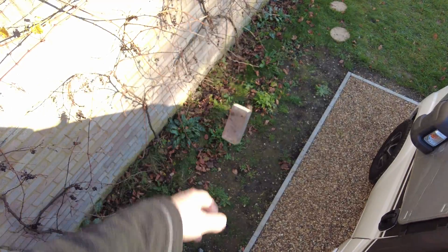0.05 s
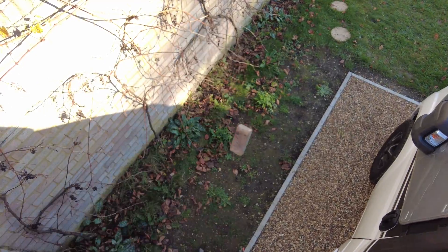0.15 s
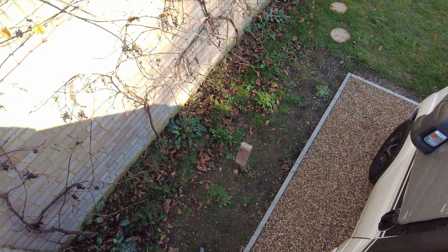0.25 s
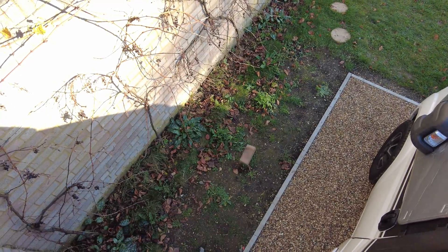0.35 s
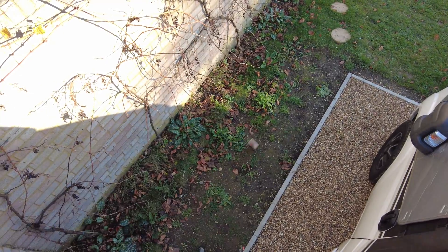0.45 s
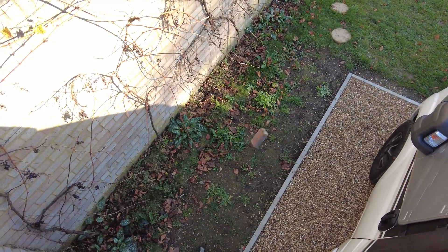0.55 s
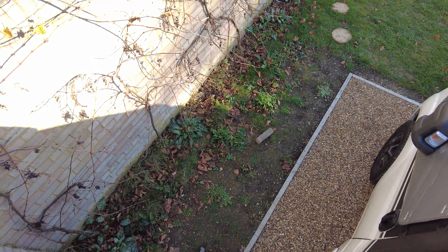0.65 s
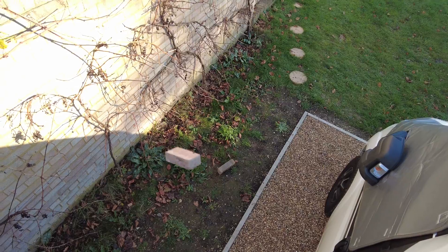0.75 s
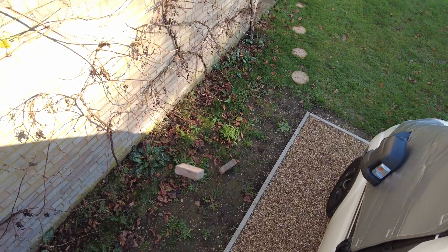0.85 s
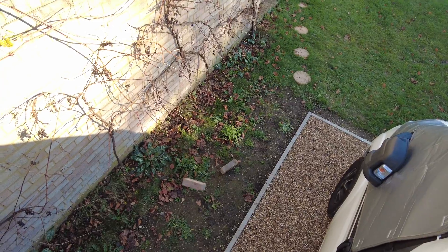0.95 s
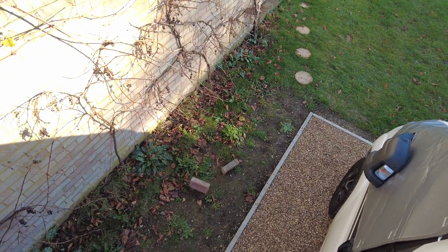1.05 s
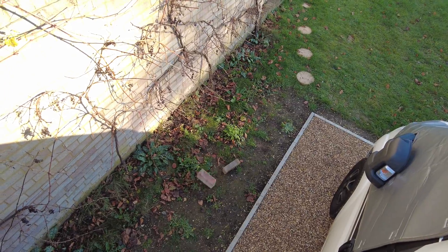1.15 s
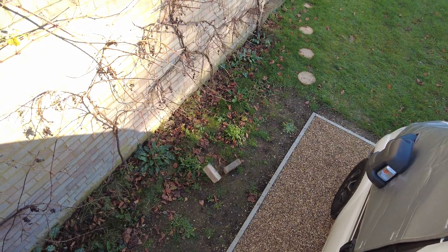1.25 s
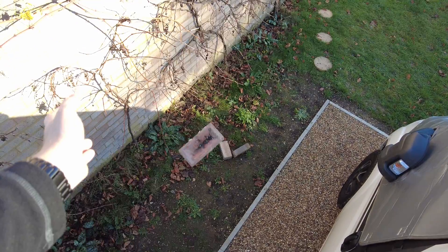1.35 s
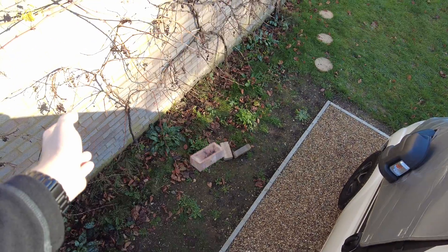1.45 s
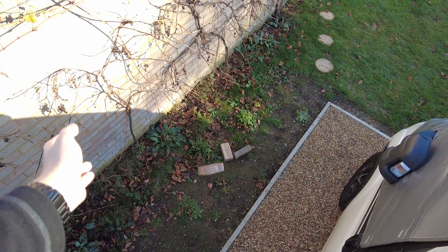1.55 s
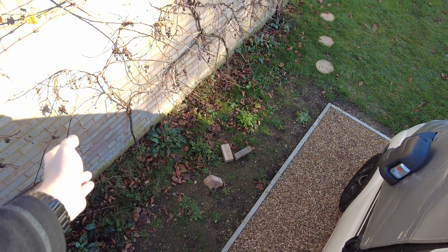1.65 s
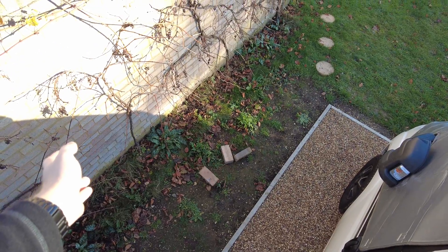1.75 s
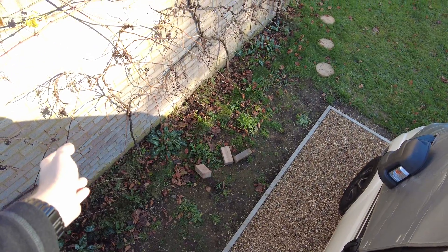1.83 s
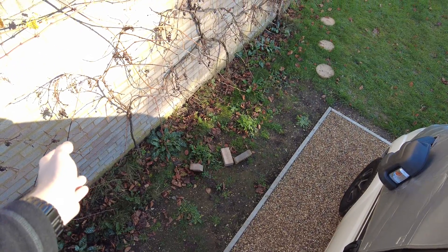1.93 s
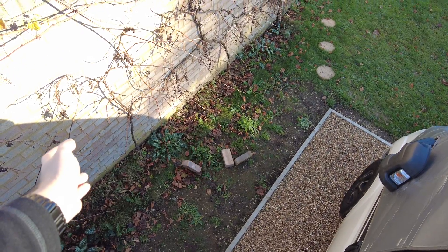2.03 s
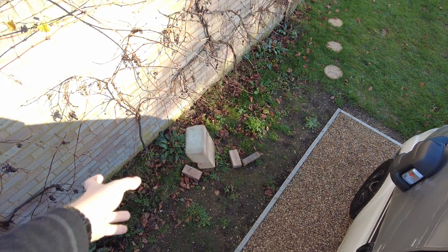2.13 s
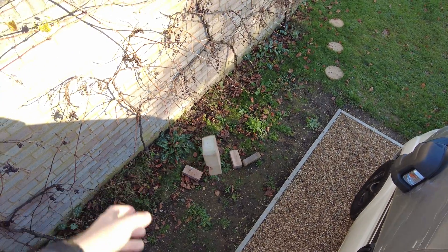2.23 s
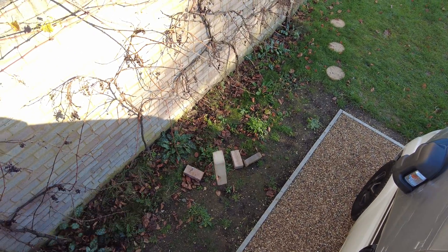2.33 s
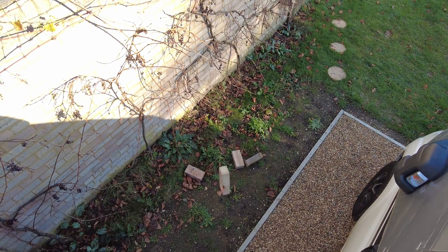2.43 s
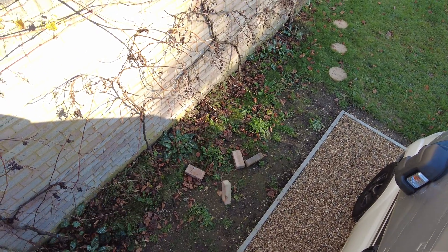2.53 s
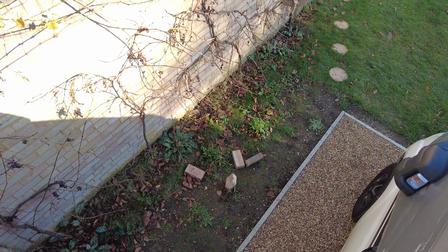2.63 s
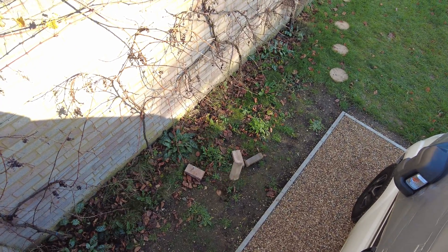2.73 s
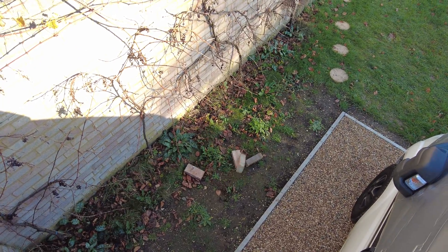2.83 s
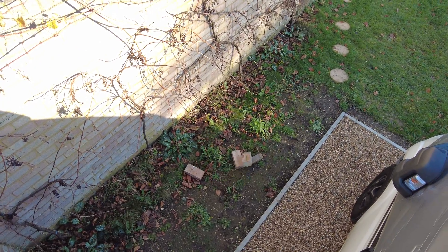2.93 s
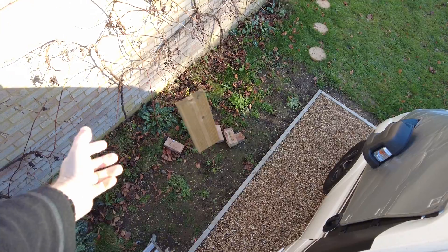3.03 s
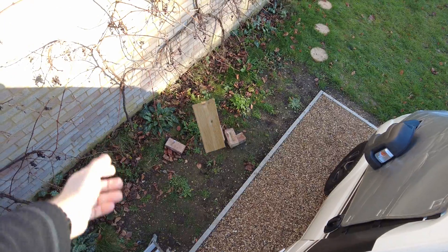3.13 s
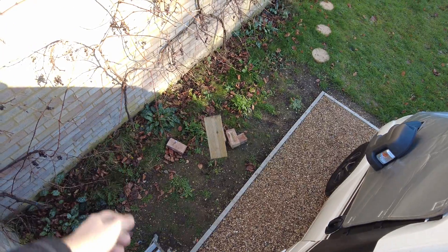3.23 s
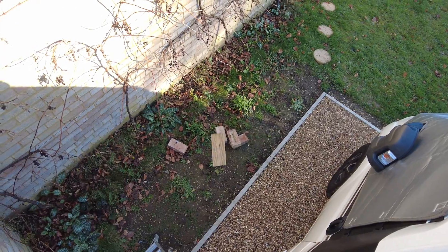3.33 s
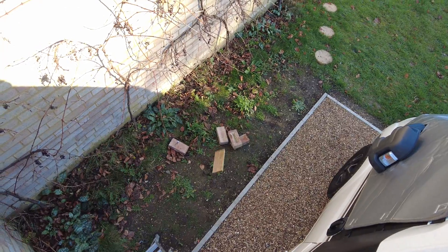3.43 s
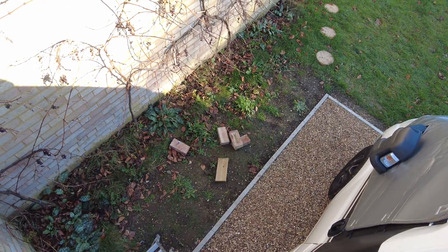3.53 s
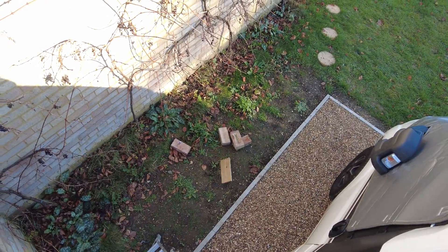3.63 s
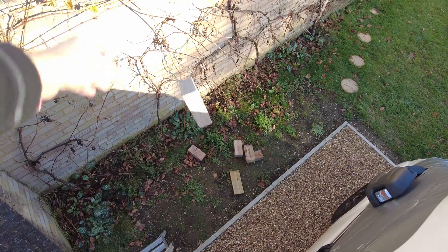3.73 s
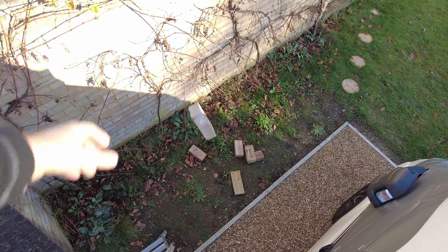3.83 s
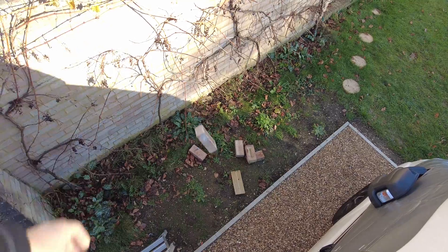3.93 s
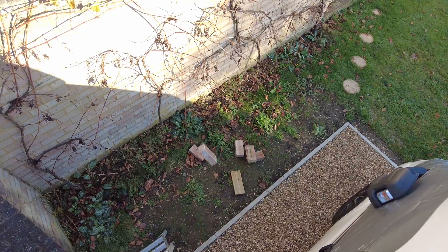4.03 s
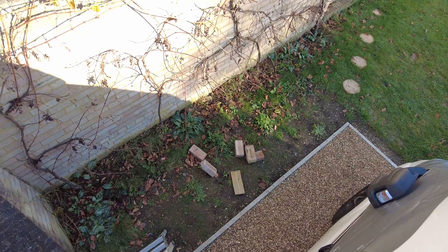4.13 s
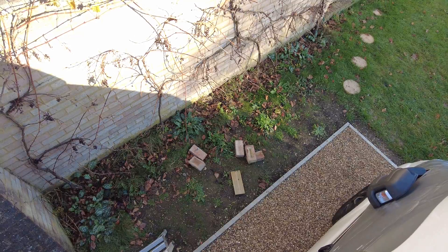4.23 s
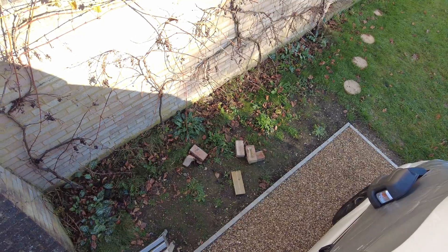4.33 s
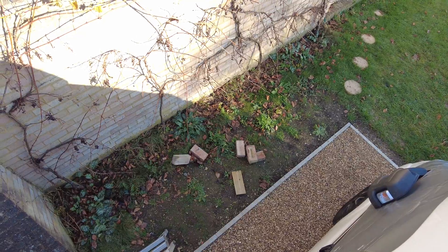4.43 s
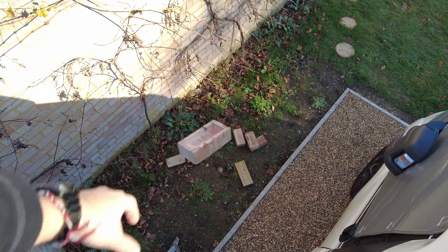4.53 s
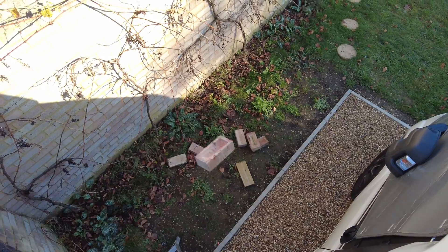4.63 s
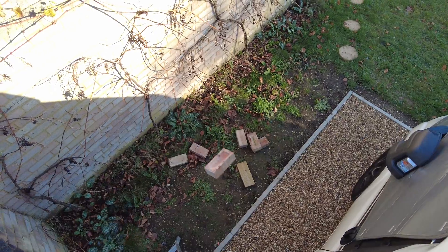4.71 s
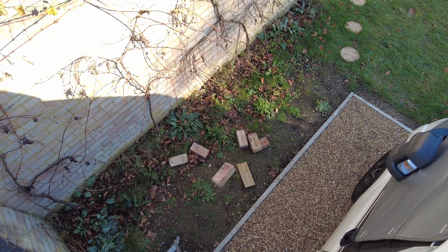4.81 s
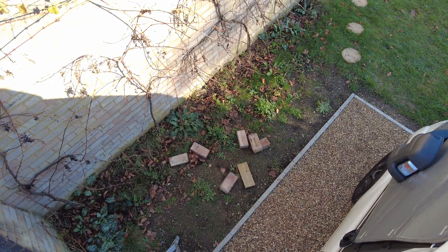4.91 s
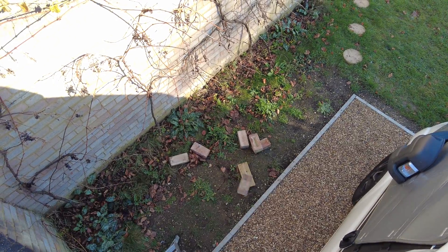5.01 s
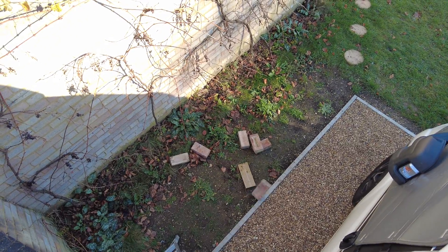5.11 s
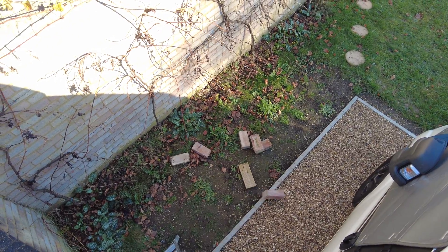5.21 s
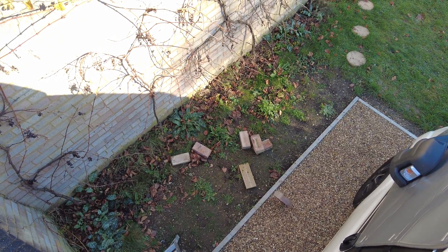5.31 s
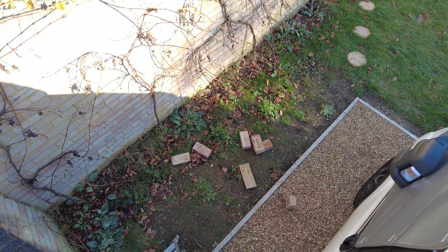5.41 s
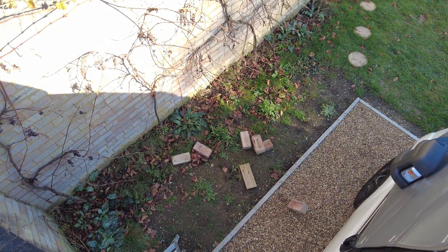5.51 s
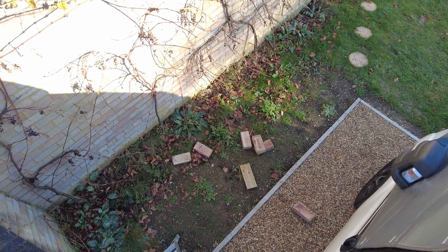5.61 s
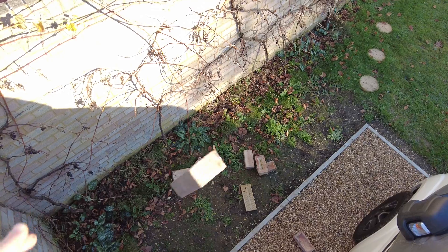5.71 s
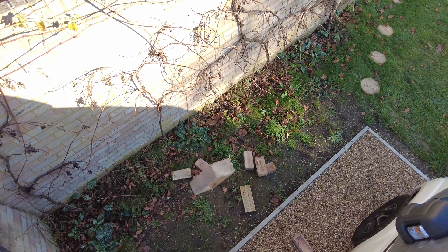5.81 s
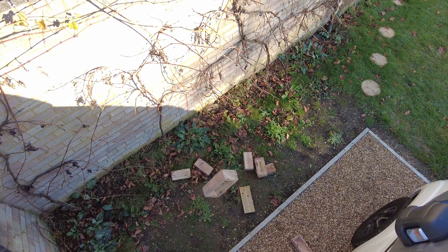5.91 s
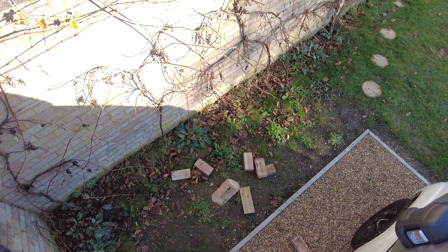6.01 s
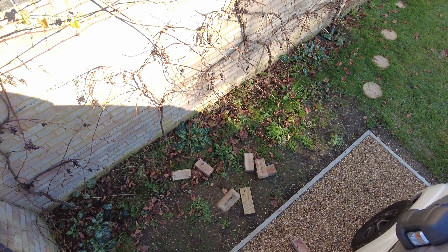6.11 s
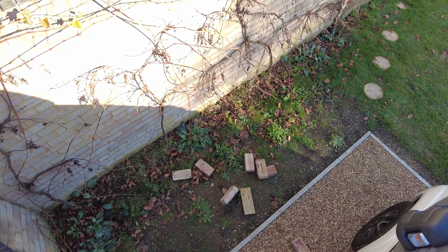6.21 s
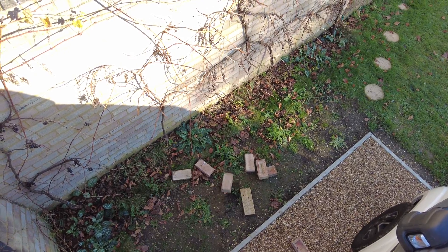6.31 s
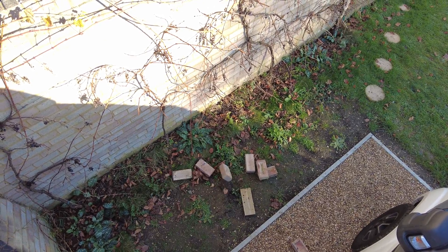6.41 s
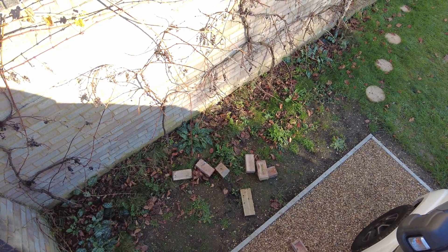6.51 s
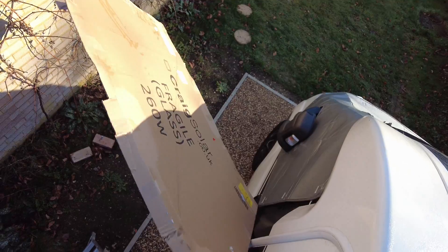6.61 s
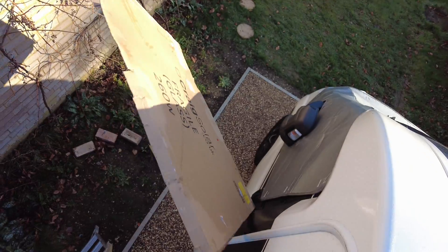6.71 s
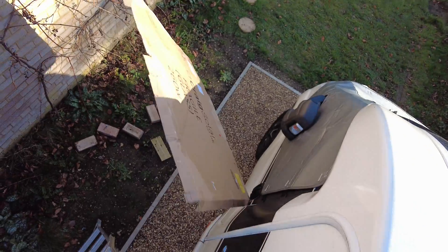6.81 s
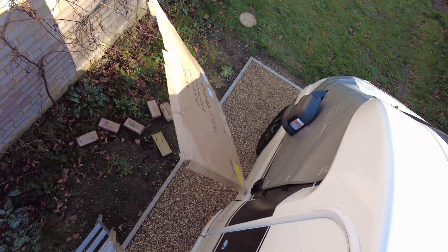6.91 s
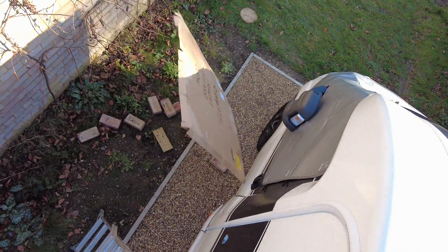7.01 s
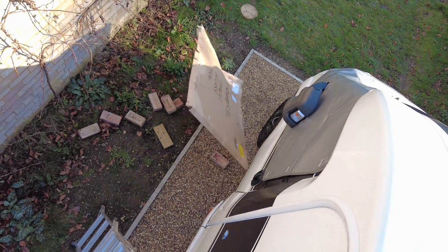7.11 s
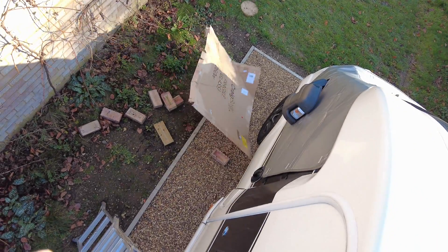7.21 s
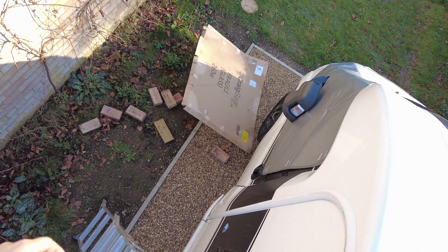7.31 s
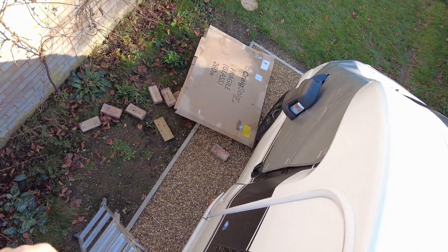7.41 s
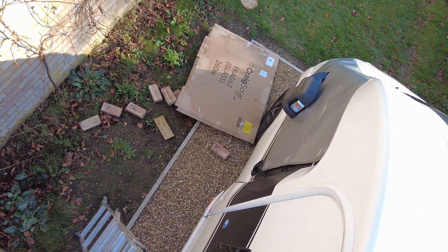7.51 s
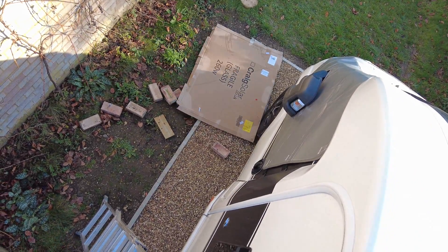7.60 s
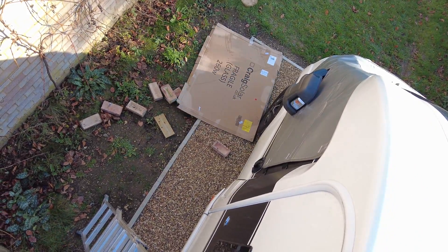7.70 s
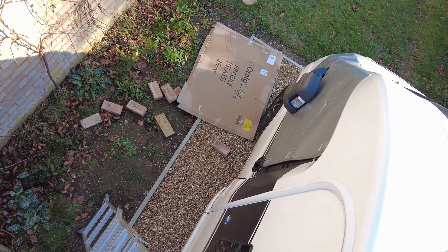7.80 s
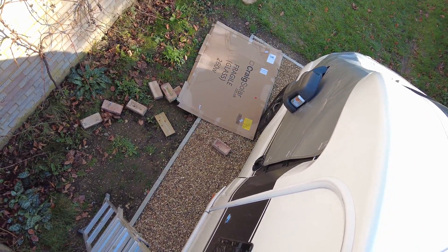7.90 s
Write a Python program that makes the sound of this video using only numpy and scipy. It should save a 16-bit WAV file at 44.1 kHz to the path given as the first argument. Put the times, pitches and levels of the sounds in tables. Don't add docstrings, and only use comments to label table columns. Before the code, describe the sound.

Bricks and a plank are thrown onto garden soil with dull thuds, knocks and ringing clinks amid buffeting wind, then a cardboard sheet slaps down.

```python
import sys
import numpy as np
from scipy import signal
from scipy.fft import rfft, irfft, next_fast_len
from scipy.io import wavfile
from scipy.ndimage import uniform_filter1d, minimum_filter1d

SR = 44100
rng = np.random.default_rng(int(sys.argv[2]) if len(sys.argv) > 2 else 0)


def convert_level_to_amplitude(level_db):
    exponent = np.asarray(level_db, float) / 20
    return 10 ** exponent


def store_wav(level_fs):
    pcm = np.round(np.clip(np.atleast_2d(level_fs), -1, 1) * 32767)
    wavfile.write(sys.argv[1], SR, pcm.T.astype(np.int16))


N = 350771
T = np.arange(N) / SR

# start_s, traffic_db, breeze_lull_db, cut_step (-1..1)
TAKES = [
    (0, -36.5, -47.5, 0),
    (0.701, -39.5, -38, -0.28),
    (1.3175, -43.5, -40, -0.49),
    (2.1194, -43.5, -34.5, -0.011),
    (3.0336, -44.5, -39.5, 0.05),
    (3.42, -43, -38.5, 0),
    (3.7344, -41, -37.5, -0.12),
    (4.568, -40.5, -43.5, -0.03),
    (5.681, -39.5, -27.5, -0.0021),
    (6.634, -33.5, -30, 0.092),
]
CUTS = np.array([row[0] for row in TAKES[1:] if row[0] != TAKES[5][0]] + [N / SR])


def per_take(table):
    return np.array(table)[np.searchsorted(np.array(TAKES)[:, 0], T, "right") - 1].T


def take_end(start_s):
    return min([row[0] for row in TAKES if row[0] > start_s] + [N / SR])


def after(s):
    end_s = min(CUTS[CUTS > s][0], s + 0.6)
    span = slice(int(s * SR), int(end_s * SR))
    return span, T[span] - T[span.start]


def swells(rows):
    piece = np.searchsorted(CUTS, T, "right")
    tents = []
    for s, top_db, rise_db_s, fall_db_s, *_ in rows:
        tent_db = top_db - np.maximum(rise_db_s * (s - T), fall_db_s * (T - s))
        tents.append(np.where(piece == np.searchsorted(CUTS, s, "right"), tent_db, -90))
    db = np.array(tents)
    return np.maximum(db.max(axis=0), -90), db.argmax(axis=0)


def unit(x):
    return x / np.sqrt(np.mean(x ** 2))


def colour(x, spectrum):
    hz, db = np.transpose(spectrum)
    f = np.maximum(np.fft.rfftfreq(N, 1 / SR), 1)
    gain = convert_level_to_amplitude(np.interp(np.log(f), np.log(hz), db, left=-90, right=-90))
    return unit(irfft(rfft(x) * gain, N))


def walk(rate_hz):
    k = int(SR / rate_hz)
    held = np.repeat(rng.standard_normal(N // k + 1), k)
    return unit(uniform_filter1d(uniform_filter1d(held, k), k)[:N])


def grains(rate_hz, spread_db, bed):
    hits = rng.random(N) < rate_hz / SR
    clicks = hits * convert_level_to_amplitude(spread_db * rng.exponential(size=N)) * rng.standard_normal(N)
    return unit(clicks) + bed * rng.standard_normal(N)


def band(x, hz, width_hz):
    return signal.lfilter(*signal.iirpeak(hz, hz / width_hz, SR), x)


def lowpass(x, order, hz):
    return signal.sosfiltfilt(signal.butter(order, hz, fs=SR, output="sos"), x)


def highpass(x, order, hz):
    return signal.sosfiltfilt(signal.butter(order, hz, "high", fs=SR, output="sos"), x)


def patchy(x, patch_db, rate_hz):
    centres_hz = 700 * 2 ** np.arange(0, 4.6, 0.5)
    return unit(sum(band(x, hz, hz * 0.4) * convert_level_to_amplitude(patch_db * walk(rate_hz)) for hz in centres_hz))


def brighten(x, db):
    low = lowpass(x, 2, 7440)
    return low + convert_level_to_amplitude(db) * (x - low)


def fade(t, t60_s):
    return np.exp(-np.log(1000) * t / t60_s)


def ring(t, modes):
    return sum(convert_level_to_amplitude(db) * fade(t, t60_s) * np.sin(2 * np.pi * hz * t) for hz, db, t60_s in modes)


# hz, level_db
WIND = [(18, -5.5), (45, -4.5), (90, -2.5), (150, -6.5), (230, -14), (400, -34)]
FLUTTER = [(120, -29.5), (220, 3), (400, 0), (800, -20), (1400, -35), (2500, -64)]
BREEZE_COLOUR = [(18, -2.5), (35, -4), (65, -9), (110, -11), (200, -27), (400, -52.5)]
# peak_s, level_db, rise_db_s, fall_db_s, flutter_rel_db
GUSTS = [(0.026, -17, 300, 58, -26), (0.101, -12.5, 110, 116, -8.5), (.226, -12.5, 126.5, 43, 1),
         (0.401, -8, 36, 20, -7.5), (.635, -5.5, 128.5, 30, -15.5), (.69, -6, 60, 3, -2.5),
         (1.11, -7.5, 900, 109, -12), (1.185, -8, 398.5, -1, -16.5), (3.4, -19.5, 499, 200.5, -27),
         (3.504, -5, 421, 374, -21.5), (3.62, -18.5, 695, 57, -19), (4.585, -10.5, 1500.5, 598, -12.5)]
# peak_s, level_db
PUFFS = [(1.51, -43.5), (1.768, -12), (2.19, -20), (2.31, -22), (2.499, -29), (2.682, -10), (2.79, -29),
         (3.139, -23.5), (4.1, -31), (4.24, -15.5), (4.41, -26), (4.71, -28.5), (5.0, -30), (5.29, -45.5),
         (5.724, -20), (6.37, -20.5), (6.46, -27), (7.01, -36), (7.39, -25)]
# start_s, peak_db, swing_hz
POPS = [(0.022, -8.5, 60), (0.064, -7.5, 62), (0.137, -9, 75), (0.31, -0.5, 84), (0.556, -7, 95),
        (0.601, -9, 110), (0.105, -6, 141), (0.173, -4.5, 118), (0.214, 3.5, 195), (0.24, -3, 140),
        (0.261, -6.5, 120.5), (0.336, -3.5, 194), (0.363, -14, 118), (0.376, 7.5, 199.3), (0.393, 8, 130),
        (0.427, 7.5, 139), (0.455, -1.5, 130), (0.53, -17, 131), (0.624, -1, 129), (0.676, 6.5, 193),
        (0.688, 7.5, 127), (1.181, -1.5, 140.3), (1.2509, -1.5, 320), (1.284, -10, 202), (3.492, -4.5, 95),
        (3.685, -19.5, 204), (3.705, -18.5, 150)]


def wind():
    puff_rise_db_s, puff_fall_db_s = 450, 199.5
    flutter_per_db = 2
    puffs = walk(28)
    buffet = unit(colour(rng.standard_normal(N), WIND) * convert_level_to_amplitude(3.16 * puffs))
    flutter = unit(colour(rng.standard_normal(N), FLUTTER) * convert_level_to_amplitude(2.4 * puffs + 5.4 * walk(70)))
    gust_db, leader = swells(GUSTS)
    _, top_db, _, _, flutter_db = np.array(GUSTS)[leader].T
    out = convert_level_to_amplitude(gust_db) * (buffet + convert_level_to_amplitude(flutter_db + flutter_per_db * (gust_db - top_db)) * flutter)

    puff_db = swells([(s, db, puff_rise_db_s, puff_fall_db_s) for s, db in PUFFS])[0]
    breeze = unit(colour(rng.standard_normal(N), BREEZE_COLOUR) * convert_level_to_amplitude(1.6 * walk(13)))
    out += (convert_level_to_amplitude(per_take(TAKES)[2]) + convert_level_to_amplitude(puff_db)) * breeze

    pops = np.zeros(N)
    for s, db, swing_hz in POPS:
        span, t = after(s)
        swing = fade(t, 6 / swing_hz) * np.cos(2 * np.pi * swing_hz * t)
        pops[span] -= convert_level_to_amplitude(db + 1.5) * swing * (1 - np.exp(-t * swing_hz / 0.055)) ** 3
    return out + lowpass(pops, 2, 1300)


# hz, level_db
TRAFFIC = [(71, -36), (120, -10.5), (210, -4.5), (355, -11), (520, -20.5), (1250, -29.5), (12000, -54),
           (13300, -73)]
# start_s, start_hz, end_hz, width_hz, level_db
DRONES = [
    (0.706, 367, 250, 70, -51),
    (1.3176, 198, 165.6, 60, -32.5),
    (3.041, 197.8, 190, 60, -43.5),
    (3.736, 134.1, 128.3, 10, -44.5),
    (3.739, 259.8, 220, 60, -49),
    (7.12, 124.8, 120.7, 14, -34.5),
    (6.636, 80, 80.24, 16, -33.5),
]


def traffic():
    swell_db = 6
    out = colour(rng.standard_normal(N), TRAFFIC) * convert_level_to_amplitude(per_take(TAKES)[1] + 0.45 * walk(1.3))
    for t0, hz0, hz1, width_hz, db in DRONES:
        t1 = take_end(t0)
        phase = 2 * np.pi * np.cumsum(np.interp(T, (t0, t1), (hz0, hz1))) / SR
        hum = walk(width_hz) * np.sin(phase) + walk(width_hz) * np.cos(phase)
        progress = np.clip((T - t0) / (t1 - t0), 0, 1)
        gate = uniform_filter1d(1.0 * (T >= t0) * (T < t1), size=200)
        out += convert_level_to_amplitude(db + swell_db * np.sin(np.pi * np.sqrt(progress))) * hum * gate
    return out


# start_s, crack_peak_db, thump_db, knock_db, knock_hz
LANDINGS = [(0.403, -14.5, -11, 8.5, 285), (0.4674, -18, -5.5, -6, 242.6), (1.0844, 0.5, -10, 0.5, 765),
            (1.7538, -16.5, -12, -12.5, 276), (2.6632, -2, -12.5, -9.5, 280.5),
            (2.764, -40, -42, -41.5, 450), (2.9098, -1.5, -25.5, 8, 850), (3.0185, -15, -38.5, -25.5, 681),
            (3.5521, -11, -25.5, 0.5, 667), (3.5773, -6, -22.5, 6, 987), (4.2344, -7, -16.5, -18.5, 289),
            (4.2511, -2.5, -13.5, -4, 1230), (4.9857, -12.5, -23.5, -4, 250.5),
            (4.9904, -15.5, -11.5, 3, 246.3), (5.206, -17, -54, 0.5, 474), (5.2813, -36, -56.5, 5.5, 415),
            (5.3024, -24, -37.5, -15, 497), (5.3097, -28, -41, -17, 292), (5.379, -40, -55, -27.5, 507),
            (5.425, -37.5, -42.5, -25, 498), (5.518, -41, -45.5, -28, 600),
            (6.2513, -15.5, -11.5, -0.5, 1000), (6.268, -9, -13.5, 4, 654)]
# start_s, crack_peak_db, thump_db, knock_db, knock_hz
TOUCHES = [
    (6.6345, -22, -27, -13.5, 412),
    (6.6581, -17, -28.5, -29, 301),
    (7.145, -31, -32.5, -14, 382),
    (7.1711, -4.5, -22, -0.5, 356),
    (7.3918, -21, -26, -23, 276),
    (7.5133, -25, -34.5, -18, 1390),
    (7.5442, -46, -25.5, -15, 415),
    (7.557, -41, -36.5, -22, 1300),
    (7.5898, -43, -35.5, -8, 348),
    (7.8297, -45, -34.5, -21.5, 366),
]
SHEET_DOWN_S = TOUCHES[2][0]
# hz, level_db, t60_s
SOIL = [(95, 5, .18), (62, -16, 0.13), (190, 2, 0.059)]
# hz, level_db
CRACK = [(350, -26.5), (800, -0.5), (2450, -2.5), (3770, -10.5), (5610, -10), (8350, -17.5), (15100, -21.5),
         (15900, -24.5)]


def landings():
    crack_t60_s, spray_t60_s = 0.032, 0.22
    out = np.zeros(N)
    crack = colour(grains(6000, 1.2, 1.0), CRACK)
    noise = rng.standard_normal(N)
    for s, crack_db, thump_db, knock_db, knock_hz in LANDINGS + TOUCHES:
        sparkle_db = -14.5 - 7.5 * np.log2(knock_hz / 400) + 0.3 * (crack_db + 15)
        span, t = after(s)
        rise = 1 - np.exp(-t / 0.0011)
        decay = fade(t, crack_t60_s) + 0.08 * fade(t, spray_t60_s)
        out[span] += convert_level_to_amplitude(crack_db - 3.5) * brighten(crack[span], sparkle_db + 16.5) * rise * decay
        out[span] -= convert_level_to_amplitude(thump_db + 3.0) * ring(t, SOIL)
        tail = unit(band(noise[span], knock_hz, knock_hz * 0.5)) * fade(t, 0.067)
        out[span] += convert_level_to_amplitude(knock_db) * (0.15 * tail - ring(t, [(knock_hz, 1.5, 7 / knock_hz)]))
    return out


FIRST_BRICKS = { .468: [(800, -12, 0.03), (1000, -18, 0.03), (2570, -22, 0.05), (2140, -19, 0.025),
                (6230, -36, 0.14), (9100, -47, 0.085), (10840, -37, 0.091)], .505: [(2320, -34, 0.4)],
                1.1: [(2620, -24, 0.3)], 1.087: [(760, -10, 0.035), (303, -13.5, 0.04), (1445, -7, 0.036),
                (2600, -12, .03), (3700, -19, 0.037), (5530, -31, 0.079)], 1.754: [(1040, -10.5, 0.028),
                (1350, -19, 0.036), (1880, -28, 0.063), (2277, -18, 0.032)], }
CLINKING_BRICKS = { 2.664: [(1000, -22, 0.034), (1647, -15, 0.035), (7900, -26.5, 0.04), (2410, -22, 0.2),
                   (2325, -14, 0.17), (3890, -35.5, 0.11), (5020, -8.5, 0.04), (5670, -32.5, 0.15)],
                   2.912: [(787, -11, 0.2), (1410, -17, 0.18), (2302, 2, 0.26), (1630, -16.5, 0.06),
                   (2285, -15.5, 0.15), (7000, -23, 0.06), (2612, -15.5, 0.2), (3800, -13.5, 0.17),
                   (3500, -14.5, .03), (4920, -19.5, .12), (5240, -16.5, 0.06)],
                   2.996: [(600, -21.5, 0.025), (7600, -38, .08), (5100, -46.5, .1), (3800, -47, .08)],
                   3.019: [(691.5, -19, 0.058), (2230, -21, 0.22), (3774, -34, .1), (5440, -29, 0.16),
                   (7580, -25, .2)], }
PLANK = { 3.553: [(286, 0, 0.025), (656, -1, 0.046), (1093, -9, 0.062), (3000, -26.5, 0.032),
         (4720, -26, .02)], 3.579: [(300, -9, 0.045), (563, 0, 0.025), (482, -12, 0.11), (712, -6, 0.077),
         (1000, 7, 0.024), (1192, -4, 0.079), (863, -13.5, 0.17), (1543, -19.5, 0.12), (2850, -12, 0.05),
         (3300, -11, 0.033), (2200, -11.5, 0.015), (4970, -11, 0.029)], }
LAST_BRICKS = { 4.243: [(6750, -22, 0.07)], 4.252: [(330, -17, 0.05), (482, -12.5, 0.05), (1665, -6, 0.036),
               (2750, -14, 0.069), (3178, -2, 0.065), (4610, -16, 0.08), (6370, -13, 0.057)],
               4.992: [(1696, -18, 0.027), (2046, -9, 0.017), (4140, -33.5, 0.089), (5300, -26, .03)],
               5.206: [(300, -6, 0.025)], 5.282: [(250, 2, 0.034), (953, -10, 0.02), (1500, -8, 0.019),
               (2300, -22, 0.015)], 5.207: [(2480, -30.5, 0.24), (2760, -11.5, 0.037), (4037, -33, 0.091),
               (5480, -32, 0.12), (6000, -41, 0.079), (8040, -34, 0.06), (11000, -37, 0.059)],
               5.302: [(2504, -16.5, 0.071), (2700, -37, 0.14), (4030, -36, 0.073), (5800, -31, 0.083),
               (11350, -30, 0.08)], 5.356: [(4070, -44, .4)], 5.44: [(4070, -44, .35)],
               7.02: [(9500, -31, 0.032)], 7.545: [(670, -15, 0.047)], 7.557: [(1230, -18, 0.05),
               (1650, -20.5, 0.056)], 7.591: [(700, -16, 0.023), (1500, -23, .025)],
               6.252: [(1000, -34, .03), (2860, -13, 0.047), (6350, -16.5, 0.061)],
               6.267: [(1000, 0.5, 0.022), (3050, -35, 0.1), (4580, -19.5, 0.066)],
               6.275: [(2680, -31.5, 0.33)], }
# start_s, level_db, second_mode_lean_db
TUMBLE = [(5.382, -47, -2), (5.438, -50, -4), (5.494, -49, 2), (5.544, -45, 9), (5.614, -44, 6),
          (5.657, -47, 5), (5.6745, -50, -2)]
# hz, level_db, t60_s
HALF_BRICK = [(2510, -1, 0.16), (2740, -1, 0.13)]
SPINS = {.505: (.02, .09, -8), 1.1: (.05, .075, -4), 6.275: (.03, .11, -10), 2.912: (.001, .021, -11)}


def rings():
    muffle_s, waver_db, wobble_rad = 0.007, 1.6, 0.4
    out = np.zeros(N)
    waver = walk(60)
    blows = {**FIRST_BRICKS, **CLINKING_BRICKS, **PLANK, **LAST_BRICKS}
    for s, db, lean_db in TUMBLE:
        blows[s] = [(hz, db + top_db - lean_db * (-1) ** k, t60_s)
                    for k, (hz, top_db, t60_s) in enumerate(HALF_BRICK)]
    for s, modes in blows.items():
        span, t = after(s)
        swell_s, down_s, muffle_db = SPINS.get(s, (0.001, 1, 0))
        muffle = convert_level_to_amplitude(muffle_db * np.clip((t - down_s) / (2 * muffle_s), 0, 1))
        shape = (1 - np.exp(-t / swell_s)) * muffle
        for k, (hz, db, t60_s) in enumerate(modes):
            turn = np.roll(waver, 5000 * k)[span]
            tone = np.sin(2 * np.pi * hz * t + wobble_rad * turn[::-1])
            out[span] += convert_level_to_amplitude(db + waver_db * turn) * fade(t, t60_s) * shape * tone
    return out


def yard(x):
    tail_t60_s, tail_db, fore_s, fore_db = 0.19, -13.5, 0.0073, -19.5
    t = T[:SR // 4]
    tail = unit(rng.standard_normal(len(t)) * fade(t, tail_t60_s) * (t > 0.004)) / np.sqrt(len(t))
    fore = unit(rng.standard_normal(len(t)) * np.exp(-t / fore_s)) / np.sqrt(len(t))
    bright = signal.sosfilt(signal.butter(2, 300, "high", fs=SR, output="sos"), x)
    dull = signal.sosfilt(signal.butter(1, 1800, fs=SR, output="sos"), bright)
    wet = convert_level_to_amplitude(tail_db) * signal.fftconvolve(dull, tail)[:N]
    wet *= np.prod([1 - (T >= s) * (T < s + 0.2) for s in CUTS], axis=0)
    ahead = signal.fftconvolve(bright[::-1], fore)[:N][::-1]
    return x + wet + convert_level_to_amplitude(fore_db) * ahead


def cut_steps():
    return sum(step * np.exp(np.minimum(T - s, 0) / 0.0056) * (T < s) for s, _, _, step in TAKES)


# start_s, centre_hz, width_hz, level_db
TYRES = [(1.3176, 1500, 500, -69), (2.1198, 1397, 400, -58.5), (3.0345, 900, 502, -61),
         (3.7344, 1363, 400, -58.5), (5.682, 1060, 900, -49), (6.634, 1510, 900, -41)]


def tyres():
    out = np.zeros(N)
    noise = rng.standard_normal(N) * convert_level_to_amplitude(1.5 * walk(8.4))
    for t0, hz, width_hz, db in TYRES:
        hiss = unit(band(band(noise, hz, width_hz), hz, width_hz))
        out += convert_level_to_amplitude(db) * hiss * (T >= t0) * (T < take_end(t0))
    return out


# peak_s, level_db, rise_db_s, fall_db_s, sparkle_db
TRICKLES = [(1.927, -33.5, 799.5, 501, -9.5), (1.95, -48, 797.5, 2, -11), (4.269, -29.5, 3000.5, 138, -6),
            (4.4, -46, 97, 12, -7.5), (5.308, -35.5, 2999, 520, 6), (5.385, -44.5, 300, 300, 3),
            (5.432, -46.5, 150, 200, 5), (5.504, -43.5, 230.5, 351, 1), (5.6, -56, 29, 3, -2),
            (6.416, -49.5, 250, 76, -6.5), (6.515, -42.5, 500, 28, -13), (3.61, -48, 900, 110, -21),
            (6.66, -34, 500, 300, -11), (6.77, -41, 200, 250, -4), (6.885, -43, 150, 200, -16),
            (7.075, -43, 120, 302, -10), (6.93, -46, 12, 18, -29)]
# hz, level_db
GRIT_COLOUR = [(410, -37.5), (700, -2.5), (1140, -11.5), (1290, -2), (2760, -7), (4420, -7.5), (14700, -14),
               (15900, -11.5)]
# start_s, peak_db, centre_hz
TICKS = [(1.905, -36, 800), (2.04, -38, 7000), (3.65, -40, 1900), (3.698, -33, 1650), (4.395, -40, 14500),
         (4.475, -43, 12000), (4.476, -38, 5600), (4.494, -33, 5200), (5.432, -31, 4400),
         (5.645, -46, 13000), (5.675, -51, 9500), (6.3718, -45, 5870), (6.4142, -40, 5330),
         (6.5179, -37, 4430), (6.6082, -38, 8500), (6.683, -33, 8300), (6.726, -37, 4700),
         (6.8801, -37, 7500), (7.0587, -35, 9290), (7.0787, -34, 8730), (7.3938, -17, 12500),
         (7.455, -29, 6480), (7.612, -31, 7500), (7.645, -37, 8800), (3.61, -37, 5300), (3.678, -42, 6500)]


def grit():
    tick_t60_s, tick_rel_width = 0.027, 0.19
    db, leader = swells(TRICKLES)
    bed = patchy(colour(grains(6000, 1.5, 1.2), GRIT_COLOUR), patch_db=3.5, rate_hz=45)
    out = brighten(bed, np.array(TRICKLES)[leader, -1] + 5) * convert_level_to_amplitude(db + 1.0 * walk(40))
    noise = rng.standard_normal(N)
    for s, tick_db, hz in TICKS:
        span, t = after(s)
        tick = unit(band(noise[span], hz, hz * tick_rel_width))
        out[span] += convert_level_to_amplitude(tick_db - 4) * tick * fade(t, tick_t60_s) * (1 - np.exp(-t / 0.0008))
    return out


# peak_s, level_db, rise_db_s, fall_db_s
RATTLE = [(5.33, -46, 300, 40), (5.45, -45, 60, 50), (5.56, -51, 60, 60), (5.64, -52, 60, 30)]


def rattle():
    strikes = grains(600, 3.0, 0.6)
    modes = sum(convert_level_to_amplitude(db + 1.5 * walk(25)) * unit(band(strikes, hz, 30)) for hz, db, _ in HALF_BRICK)
    return modes * convert_level_to_amplitude(swells(RATTLE)[0])


LIFTED_DB = 10
# peak_s, level_db, rise_db_s, fall_db_s
RASP = [(6.512, -54, 900, 60), (6.61, -46.5, 118, 20), (6.8, -44.5, 57, 30), (6.95, -46, 40, 50),
        (7.226, -22, 700, 250), (7.36, -48, 60, 298)]
# hz, level_db
RASP_COLOUR = [(1500, -24.5), (2100, -6), (2800, 1.5), (3400, -4.5), (4500, -11.5), (5200, -34)]


def rasp():
    noise = patchy(colour(grains(1500, 3.0, 0.8), RASP_COLOUR), patch_db=3.5, rate_hz=23)
    airborne = (T > 7.08) * (T < SHEET_DOWN_S)
    return noise * convert_level_to_amplitude(swells(RASP)[0] - LIFTED_DB * airborne)


# peak_s, boom_db, rise_db_s, fall_db_s
SLAPS = [(6.652, -22.5, 400, 322), (6.72, -36.5, 100, 12), (7.142, -29, 1500, 90),
         (7.176, -11.5, 435, 79.5), (7.225, -2.5, 325, 153), (7.275, -9, 200, 103),
         (7.335, -11.5, 150, 116), (7.42, -23, 295, 153), (7.546, -17.5, 2500, 260),
         (7.596, -21.5, 900, 450), (7.65, -27, 200, 150), (7.62, -33.5, 100, 11), (7.836, -23, 800, 330)]
# hz, level_db
BOOM = [(150, -17), (260, -6.5), (366, -1.5), (520, -5), (750, -14), (1200, -37)]
FLAP = [(500, -30), (900, -0.5), (1400, 4.5), (2500, -12), (3300, -18), (3800, -41)]
RUSTLE = [(1760, -31), (3000, -6.5), (3380, -19), (3830, -30), (4430, -14.5), (10200, -11.5), (14900, -14),
          (15900, -12.5)]


def sheet():
    flap_db, flap_per_db = -12.5, 1
    rustle_db, rustle_per_db = -36.5, 0.25
    rest_s, rest_db_s = 7.59, 57
    scrape_db = 7
    shake, db = walk(35), swells(SLAPS)[0]
    above = T < SHEET_DOWN_S
    rest_db = rest_db_s * np.maximum(T - rest_s, 0)
    boom = unit(colour(rng.standard_normal(N), BOOM) * convert_level_to_amplitude(0.92 * shake)) * convert_level_to_amplitude(db)
    flap = patchy(colour(grains(3000, 1.8, 1.8), FLAP), patch_db=1.5, rate_hz=25)
    flap *= convert_level_to_amplitude(flap_db + flap_per_db * db - rest_db / 2 + scrape_db * above + 1.0 * shake)
    rustle = patchy(colour(grains(4000, 1.3, 0.9), RUSTLE), patch_db=2.1, rate_hz=30)
    rustle *= convert_level_to_amplitude(rustle_db + rustle_per_db * db - rest_db - LIFTED_DB * above + 1.7 * walk(20))
    return (boom + flap + rustle) * (T >= TAKES[-1][0])


# peak_s, level_db, rise_db_s, fall_db_s
CRASH = [(7.1435, -23, 5000, 200), (7.173, -11.5, 1300, 300), (7.207, -16, 1500, 300),
         (7.225, -17, 1500, 333), (7.3, -41, 1500, 300), (7.317, -35, 1500, 300), (7.363, -32, 1500, 500),
         (7.455, -38, 300, 400)]
# hz, level_db
CRASH_COLOUR = [(600, -5.5), (1200, 2), (3000, -6.5), (4500, -13.5), (9000, -17.5), (14000, -15.5),
                (15900, -17.5)]


def crash():
    stones = patchy(colour(grains(4000, 2.3, 1.1), CRASH_COLOUR), patch_db=4.0, rate_hz=70)
    return stones * convert_level_to_amplitude(swells(CRASH)[0]) * (T >= CRASH[0][0])


def scene():
    mono = wind() + traffic() + yard(landings() + rings()) + cut_steps() + tyres()
    mono += grit() + rattle() + rasp() + sheet() + crash()
    return np.array([mono, mono])


def roll_off(x):
    return signal.sosfilt(signal.butter(12, 16050, fs=SR, output="sos"), x)


# centre_hz, width_hz, added_db
PORTS = [(4460, 500, -14.5), (7790, 200, -4.5), (9200, 370, -7.5)]
# side_low_db, side_high_db, left_lean (-1..1)
WIDTHS = [(-54, -5, -.1), (-78, -2, 0.048), (-9.5, -1, -0.086), (-13, -4, -0.45), (-15.5, -2, -0.15),
          (-67, -5.5, -.1), (-4, -3, -.1), (-76, -5.5, -0.035), (-66, -6.5, 0.047), (-9, -1.5, -0.18)]


def record(dry):
    knee, split_hz, top_hz = 14.0, 3380, 15950
    mid = dry[0] + sum(convert_level_to_amplitude(db) * band(dry[0], hz, width_hz) for hz, width_hz, db in PORTS)
    mid = 1.013 * mid / (1 + np.abs(mid) ** knee) ** (1 / knee)
    low_db, high_db, lean = per_take(WIDTHS)
    smear = rng.standard_normal(400) * np.exp(-np.arange(400) / 70)
    copy = signal.fftconvolve(mid, unit(smear) / 20)[:N]
    other = signal.hilbert(copy, next_fast_len(N))[:N]
    other = np.real(other * np.exp(2.5j * walk(45))) + lean * mid
    low = lowpass(other, 3, split_hz)
    low = 0.084 * low + highpass(low, 1, 400)
    high = highpass(other, 3, split_hz)
    quiet = minimum_filter1d(1.0 * (np.abs(mid) < 0.8), size=2048)
    side = convert_level_to_amplitude(low_db) * low + convert_level_to_amplitude(high_db) * high * np.where(low_db < -50, quiet, 1)
    both = np.clip([mid + side, mid - side], -1, 1)
    both = signal.sosfiltfilt(signal.ellip(10, 0.01, 35, top_hz, fs=SR, output="sos"), both)
    return roll_off(both)


dry = scene()
out = record(dry)
store_wav(out)
```